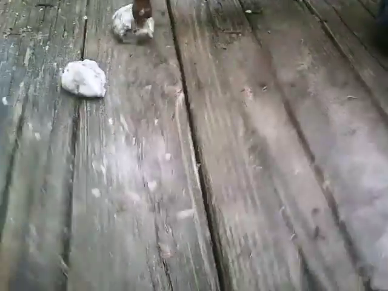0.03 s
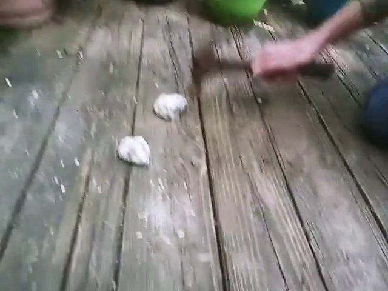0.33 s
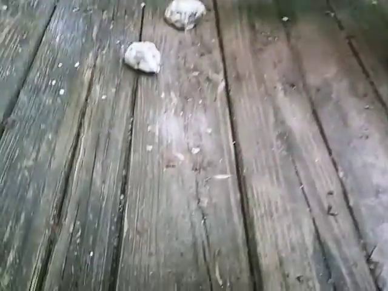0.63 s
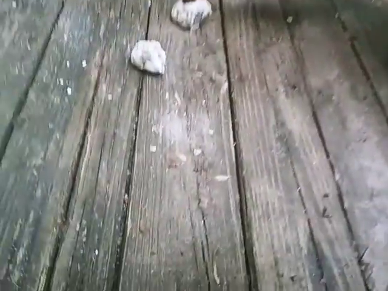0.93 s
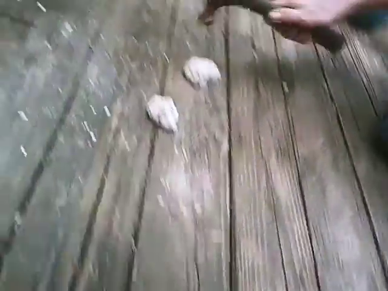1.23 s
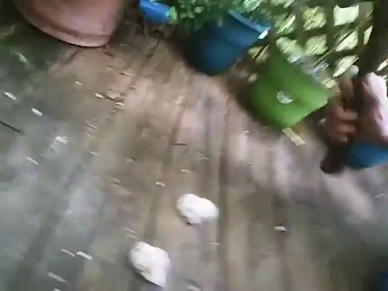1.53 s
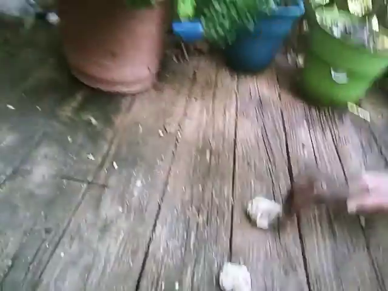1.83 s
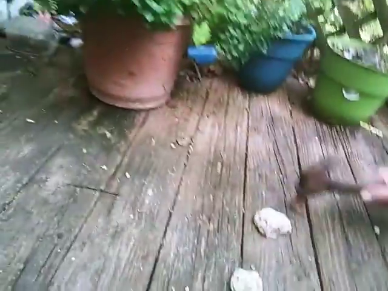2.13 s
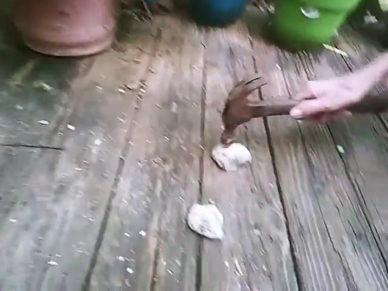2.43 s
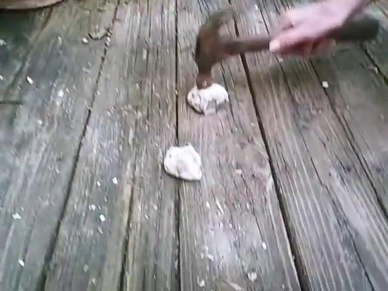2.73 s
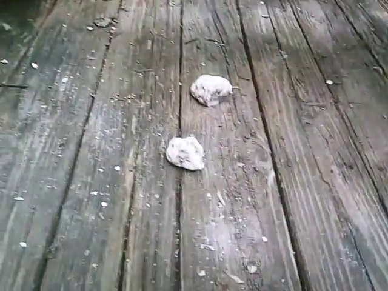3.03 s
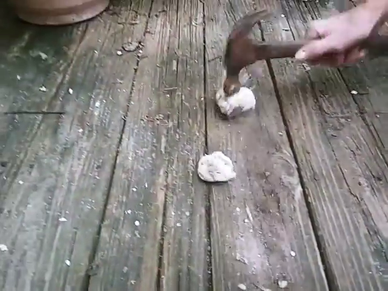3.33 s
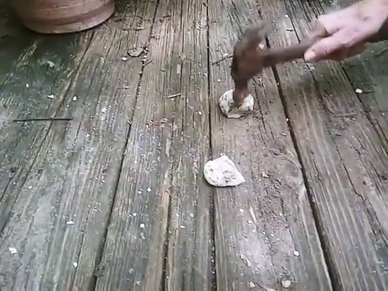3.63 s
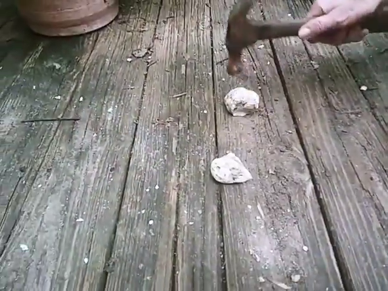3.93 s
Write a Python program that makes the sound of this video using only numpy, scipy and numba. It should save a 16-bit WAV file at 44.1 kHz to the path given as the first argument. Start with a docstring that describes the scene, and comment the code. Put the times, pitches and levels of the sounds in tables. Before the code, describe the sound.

A hammer strikes a small rock on a wooden deck, close up, right at the start, at 1.7 seconds and at 3.4 seconds. Each blow cracks sharply, with a brief steel ring and booming boards. Lighter taps come at 0.8 and 2.5 seconds. The rock scuffs over grit around 1.2 seconds and knocks on the planks near 1.5 and 2 seconds. Insects buzz faintly outdoors throughout.

```python
"""Hammering a rock on a wooden deck

Close to one microphone, a steel hammer strikes a small rock: three hard blows, with a light aiming
tap before the second and third. The head rings, the boards boom and the rock hops and scuffs on the
wood. Insects buzz in the trees around the yard. The microphone's limiter flattens each hard blow."""
import sys
import numpy as np
from scipy import signal
from scipy.fft import rfft, irfft
from scipy.io import wavfile
from scipy.ndimage import uniform_filter1d
from numba import njit

SR = 44100
rng = np.random.default_rng(int(sys.argv[2]) if len(sys.argv) > 2 else 0)


def wav_out(sig):
    """Save sig, one row per channel (or a flat mono array), as 16-bit PCM at SR to the path in sys.argv[1]."""
    wavfile.write(sys.argv[1], SR, np.round(np.clip(np.atleast_2d(sig).T, -1, 1) * 32767).astype(np.int16))


N = 176400
T = np.arange(N) / SR
AGE = T[:SR]  # seconds since a contact

# Hard blows, close up: start_s, crack_db, boards_db, ring_t60_ratio, boards_t60_ratio, beat_hz
HARD_BLOWS = [(.002, -4, -6.5, 1.0, 0.96, 5.6), (1.7335, -1, -7.5, 0.84, 0.97, 3),
              (3.3668, 1.5, -2.5, 0.77, 0.89, 7.3)]
# Ringing tones of a blow, steel head modes and one faint high overtone of the recorder: pitch_hz
RING_PITCHES = [5157, 5176, 5266, 6156, 6398, 7348, 9600, 13472, 14890, 15363]
# Their mix depends on where the face lands: base_t60_s, first_blow_db, second_blow_db, third_blow_db
RING_MIX = [(0.38, -20, -10, -24), (0.5, -37, -11.5, -25), (0.29, -39, -7, -32), (0.23, -22, -28, -46),
            (0.42, -9, -2, -2), (0.18, -24, -22, -11.5), (0.48, -49, -46, -47), (0.19, -33, -58, -58),
            (.15, -40, -41, -52), (0.21, -32, -39, -40)]
# Deck boards under the rock: pitch_hz, relative_db, base_t60_s
BOARD_MODES = [(42.6, -16, 0.27), (81, -6.5, 0.24), (138.5, -5.5, 0.32), (204.8, -8.5, 0.32),
               (230.3, -11.5, 0.24), (316.3, -10, 0.43), (359.5, -14, 0.17), (458.3, -0.5, 0.22),
               (558, -10, 0.22), (649, -10.5, 0.12), (874, -13, 0.26), (1160, -17, 0.099)]
# Dense crack of stone and planks: frequency_hz, density_db
CRACK_SPECTRUM = [(60, -20), (300, -1), (800, -0.5), (1200, -4), (2200, -4), (3600, -2.5), (4300, -13),
                  (5500, -8), (7000, -17), (8200, -32), (11000, -41), (16000, -43)]
# Its decay: frequency_hz, t60_s
CRACK_DECAY = [(100, 0.9), (500, 0.23), (2000, 0.23), (5000, 0.23), (12000, 0.18)]
# Brief bright treble fizz at each hard blow: frequency_hz, density_db
FIZZ_SPECTRUM = [(7500, -3), (10000, -7), (15500, 3.5)]
# Echo coming back from the yard: frequency_hz, density_db
YARD_SPECTRUM = [(60, -7), (150, 4.5), (320, 1.5), (600, -3.5), (1200, -7), (3200, -6), (4500, -15),
                 (6500, -10.5), (8500, -41.5), (16000, -71)]
def hammer_blows():
    """Steel meets stone at close range: the rock cracks out, the head rings and the boards boom."""
    out = np.zeros(N)
    main_mode, beat_depth = 4, 0.52
    for blow, (start, crack_db, boards_db, ring_ratio, boards_ratio, beat_hz) in enumerate(HARD_BLOWS):
        rattle = amp(1.6 * drift(rate_hz=130)[:SR])  # the rock rattles on the planks
        crack = burst(CRACK_SPECTRUM, CRACK_DECAY) * rattle
        snap = amp(-8.5) * noise(CRACK_SPECTRUM, SR) * fade(t60_s=0.013)
        fizz = amp(-29) * noise(FIZZ_SPECTRUM, SR) * fade(t60_s=0.11)
        echo_rise = 1 - np.exp(-AGE / 0.041)
        echo = amp(-16.5) * noise(YARD_SPECTRUM, SR) * fade(t60_s=0.9) * echo_rise
        tones = [ring(hz, levels_db[blow], t60_s * ring_ratio)
                 for hz, (t60_s, *levels_db) in zip(RING_PITCHES, RING_MIX)]
        # The head's strongest mode beats slowly as the hammer rebounds.
        ringing = sum(tones) - tones[main_mode] * beat_depth * np.cos(2 * np.pi * beat_hz * AGE)
        boards = amp(boards_db) * struck_body(BOARD_MODES, boards_ratio)
        add(out, start, amp(crack_db) * (crack + snap + fizz + echo) + ringing + boards)
    return out


# Light taps, close up: start_s, rocking_db, rocking_hz, rocking_t60_s, clack_db, head_db, body_db
AIMING_TAPS = [(0.8433, 2, 825, .035, -22.5, -33.5, 0.5), (0.8547, -7, 800, 0.023, -34, -50, -16),
               (2.5262, -13.5, 557, 0.067, -11.5, -31.5, 0.5), (2.5386, -11.5, 875, 0.045, -22, -56, -9)]
# The rock and its board under a tap: pitch_hz, relative_db, t60_s
TAP_BODY_MODES = [(81, -29, 0.16), (180, -21, 0.059), (311, -11, 0.037), (466, -20.5, 0.1),
                  (923, -22, 0.15), (2530, -25, 0.056), (3110, -24, 0.056), (3770, -23, 0.028)]
# Clack of steel on stone: frequency_hz, density_db
CLACK_SPECTRUM = [(60, -3), (150, -3.5), (330, -2.5), (600, -5.5), (1000, 0.5), (1400, -11.5), (2500, -8.5),
                  (3700, 1.5), (4400, -17), (6500, -7), (8500, -59), (16000, -65)]
# Its decay: frequency_hz, t60_s
CLACK_DECAY = [(100, 0.34), (900, 0.13), (3000, 0.1), (9000, 0.05)]
def aiming_taps():
    """The hammer is set down and bounces once: a clack, a faint ring, the tock of the rocking stone."""
    out = np.zeros(N)
    body = struck_body(TAP_BODY_MODES)
    for start, rocking_db, rocking_hz, rocking_t60_s, clack_db, head_db, body_db in AIMING_TAPS:
        clack = amp(clack_db) * burst(CLACK_SPECTRUM, CLACK_DECAY)
        rocking = ring(rocking_hz, rocking_db, rocking_t60_s)
        head = ring(RING_PITCHES[0], head_db, t60_s=0.18)
        add(out, start, amp(body_db) * body + clack - rocking + head)
    return out


# Landings and dull bumps on the deck: start_s, noise_db, brightness_hz, t60_s, thump_hz, thump_db
DECK_KNOCKS = [(0.067, -10.5, 2800, 0.014, 324, 4), (0.205, -28, 2480, 0.028, 300, -27),
               (0.304, -31.5, 1170, 0.038, 302, -32), (1.125, -31, 776, 0.02, 283, -20.5),
               (1.5285, -19.5, 694, .025, 272, -22.5), (1.5397, -21.5, 410, 0.063, 143, -19.5),
               (1.583, -31, 450, 0.022, 238, -21.5), (1.827, -25, 660, 0.076, 406, -12.5),
               (1.979, -18, 800, .07, 291, -14), (1.991, -18, 766, 0.079, 570, -22),
               (2.167, -36, 1550, 0.39, 190, -37), (2.812, -47, 363, 0.068, 294, -33)]
def rock_knocks():
    """The rock lands and bumps on the planks: a short burst of noise over one low mode."""
    out = np.zeros(N)
    for start, noise_db, brightness_hz, t60_s, thump_hz, thump_db in DECK_KNOCKS:
        impact = rng.standard_normal(SR) * fade(t60_s)
        knock = amp(noise_db) * band(impact, low_hz=150, high_hz=brightness_hz)
        add(out, start, knock + ring(thump_hz, thump_db, t60_s))
    return out


# Grit on the deck, near the microphone: start_s, level_db
GRIT_CLICKS = [(.507, -28), (.528, -27), (.698, -26.5), (1.1525, -17), (1.2008, -8.5), (1.4485, -18),
               (1.530, -18.5), (1.580, -9.5)]
# What each click rings with: pitch_hz, relative_db, t60_s
GRIT_MODES = [(574, -4, 0.0037), (1125, -4.5, 0.0082), (1760, -11.5, 0.0038), (2440, -0.5, 0.0032),
              (3300, -16, 0.011)]
def grit_clicks():
    """Grit clicks sharply, its modes dying within milliseconds."""
    out = np.zeros(N)
    click = struck_body(GRIT_MODES)
    for start, level_db in GRIT_CLICKS:
        add(out, start, amp(level_db) * click)
    return out


# One short slide over the gritty boards: time_s, level_db, brightness_hz
SCUFF_PATH = [(1.11, -52, 900), (1.155, -30.5, 1490), (1.19, -30.5, 1370), (1.206, -24.5, 1750),
              (1.22, -17, 2340), (1.24, -25.5, 3600), (1.259, -49, 5000)]
def rock_scuff():
    """Grainy friction of rock on wood that brightens as the slide speeds up."""
    times, level_db, brightness_hz = np.array(SCUFF_PATH).T
    grains = rng.standard_normal(N) * amp(2.5 * drift(rate_hz=700))
    grains /= grains.std()
    crossfades = [np.interp(T, times, row) for row in np.eye(len(times))]
    slide = sum(band(grains, low_hz=107, high_hz=hz) * share
                for hz, share in zip(brightness_hz, crossfades))
    sliding = (T > times[0]) & (T < times[-1])
    return slide * amp(np.interp(T, times, level_db)) * sliding


# Near insects in the trees, a low and a strongly pulsed chorus: frequency_hz, density_db
LOW_CHORUS = [(2400, -16), (3000, -7.5), (3400, 3), (3750, 3), (4100, -10), (4600, -62)]
PULSED_CHORUS = [(4000, -43), (4600, -6.5), (5000, -1.5), (5200, 9.5), (5450, 0), (6400, -31), (7200, 2.5),
                 (7800, -41)]
# Farther off, a high and a thin chorus: frequency_hz, density_db
HIGH_CHORUS = [(4000, -32), (4300, -8.5), (4700, -4.5), (5300, -2.5), (5650, 2), (5850, -8), (5970, 8.5),
               (6150, -6), (6600, 5), (6900, -15), (6990, 11), (7100, -12.5), (7400, -3), (7600, -19),
               (8300, -30), (10000, -61)]
THIN_CHORUS = [(7300, 4), (8000, -1.5), (9100, 4), (9700, -4.5), (11000, -13)]
# The four as heard from the deck: time_s, low_db, pulsed_db, high_db, thin_db
CHORUS_LEVELS = [(0, -42.5, -37, -41.5, -54.5), (.55, -44.5, -50.5, -39.5, -50.5),
                 (.95, -47, -52.5, -44, -51), (1.35, -41.5, -46, -37, -52), (1.65, -41, -61, -41, -53),
                 (2.1, -38.5, -42.5, -37, -60), (2.6, -41, -40.5, -37, -54),
                 (3.2, -41.5, -43.5, -38, -59.5), (4, -41.5, -42.5, -37.5, -58)]
def insects():
    """Near insects buzz in fast clicks grouped into pulses, over smoother far choruses."""
    times, *levels_db = np.array(CHORUS_LEVELS).T
    low_gain, pulsed_gain, high_gain, thin_gain = (amp(np.interp(T, times, db)) for db in levels_db)
    click_hz, pulse_hz = 412.6, 42.6
    clicks = throb(click_hz, depth=0.5, wander=0.0007)
    low = low_gain * noise(LOW_CHORUS, N) * throb(pulse_hz, depth=0.35, wander=0.013)
    pulsed = pulsed_gain * noise(PULSED_CHORUS, N) * throb(pulse_hz, depth=1.3, wander=0.012)
    high = high_gain * noise(HIGH_CHORUS, N) * amp(1.5 * drift(rate_hz=14))
    thin = thin_gain * noise(THIN_CHORUS, N)
    return (low + pulsed) * clicks + high + thin


# Open air and distant hum around the yard: frequency_hz, density_db
AIR_SPECTRUM = [(25, -33), (55, -18), (85, 6.5), (115, 0.5), (170, -2), (250, -14), (320, -9), (450, -16.5),
                (620, -17), (900, -11), (1600, -19.5), (3000, -22), (7000, -44), (10500, -51.5),
                (13000, -42), (16000, -42)]
def outdoor_air():
    """Quiet outdoor background that swells slightly."""
    return noise(AIR_SPECTRUM, N) * amp(-42 + 1.5 * drift(rate_hz=2.3))


def amp(db):
    """Decibels to gain."""
    return 10 ** (np.asarray(db) / 20)


def fade(t60_s, contact_s=0.00038):
    """One second of exponential decay after a brief rise as the contact builds."""
    rise = 1 - np.exp(-(AGE / contact_s) ** 2)
    return rise * np.exp(-np.log(1000) * AGE / t60_s)


def add(out, start_s, sound):
    """Mix a sound in at a time."""
    i = int(start_s * SR)
    out[i:i + len(sound)] += sound[:N - i]


def lookup(points, hz):
    """Read (frequency_hz, value) points on a log-frequency axis."""
    points_hz, values = np.array(points, float).T
    return np.interp(np.log(hz + 1e-3), np.log(points_hz), values)


def noise(spectrum, size):
    """Unit-level noise with a spectrum that falls away beyond its end points."""
    hz = np.fft.rfftfreq(size, 1 / SR) + 1e-3
    skirts = np.minimum(1, np.minimum(hz / spectrum[0][0], spectrum[-1][0] / hz)) ** 6
    white = rfft(rng.standard_normal(size))
    shaped = irfft(white * amp(lookup(spectrum, hz)) * skirts, size)
    return shaped / shaped.std()


def band(x, low_hz, high_hz):
    """Band-pass that keeps white noise at about the same level."""
    bandpass = signal.butter(3, [low_hz, high_hz], "band", fs=SR, output="sos")
    return signal.sosfilt(bandpass, x) * np.sqrt(SR / 2 / (high_hz - low_hz))


def burst(spectrum, decay):
    """Many close modes struck at once; each octave dies at its own rate."""
    bins = rfft(noise(spectrum, SR))
    octave = np.log2(np.clip(np.arange(len(bins)), 64, 16384))
    out = np.zeros(SR)
    for k in range(6, 15):
        share = np.maximum(0, 1 - abs(octave - k))
        out += irfft(bins * share, SR) * fade(lookup(decay, 2. ** k))
    return out


def ring(hz, db, t60_s):
    """One decaying tone."""
    return amp(db) * np.sqrt(2) * np.sin(2 * np.pi * hz * AGE) * fade(t60_s)


def struck_body(modes, t60_ratio=1):
    """Modes struck together, alternating in sign."""
    return sum((-1) ** j * ring(hz, db, t60_s * t60_ratio) for j, (hz, db, t60_s) in enumerate(modes))


def drift(rate_hz):
    """Smooth random drift with a spread of 1."""
    hold = int(SR / rate_hz)
    steps = np.repeat(rng.standard_normal(N // hold + 2), hold)
    smooth = uniform_filter1d(uniform_filter1d(steps, hold), hold)[:N]
    return smooth / smooth.std()


def throb(hz, depth, wander):
    """Level swing at a slightly drifting rate."""
    phase = 2 * np.pi * np.cumsum(hz * (1 + wander * drift(rate_hz=3.36))) / SR
    swing = np.exp(depth * np.cos(phase))
    return swing / np.sqrt(np.mean(swing ** 2))


def scene():
    """The close work on the deck and the yard behind it, in mono."""
    deck = hammer_blows() + aiming_taps() + rock_knocks() + grit_clicks() + rock_scuff()
    return (deck + insects() + outdoor_air())[None]


@njit
def follow(x, attack_s, release_s):
    """Level follower, quick to rise and slow to fall."""
    out, level = np.empty(len(x)), 0.
    for i in range(len(x)):
        level += (x[i] - level) / (SR * (attack_s if x[i] > level else release_s))
        out[i] = level
    return out


def record(dry):
    """The microphone's limiter holds the blows down; remaining peaks are rounded and the top is cut."""
    threshold, ceiling, lookahead_s, top_hz = 0.81, 0.94, 0.00074, 15800
    level = follow(abs(dry[0]), attack_s=0.00024, release_s=0.032)
    level_ahead = np.interp(T + lookahead_s, T, level)
    held = dry * uniform_filter1d(threshold / np.maximum(level_ahead, threshold), size=32)
    rounded = held / (1 + (held / ceiling) ** 8) ** (1 / 8)
    lowpass = signal.ellip(8, .2, 70, top_hz, fs=SR, output="sos")
    return signal.sosfilt(lowpass, rounded)


dry = scene()
out = record(dry)
wav_out(out)
```